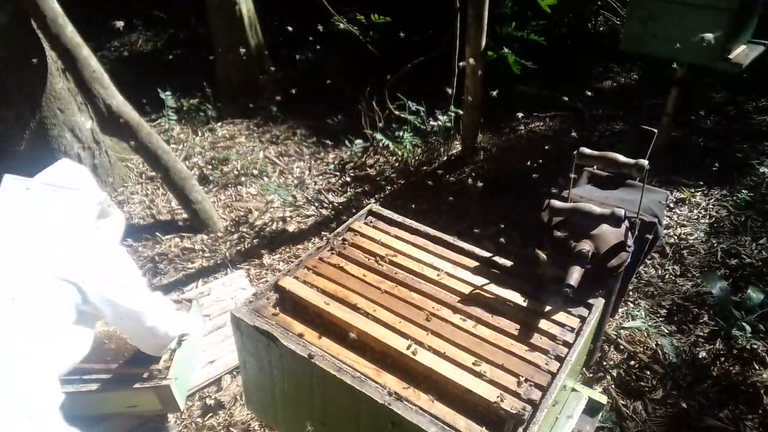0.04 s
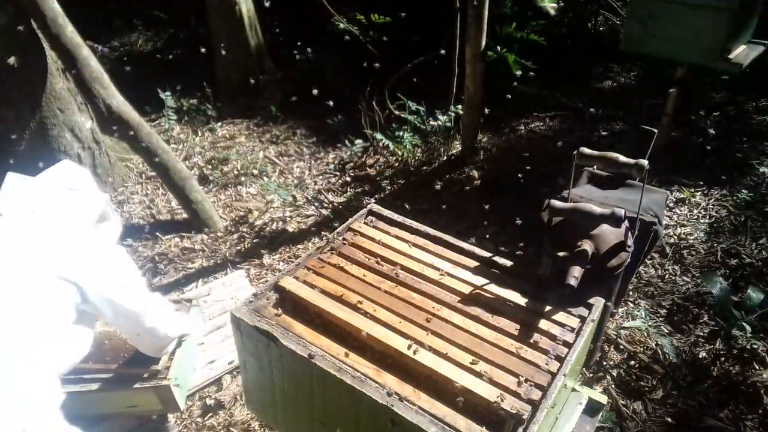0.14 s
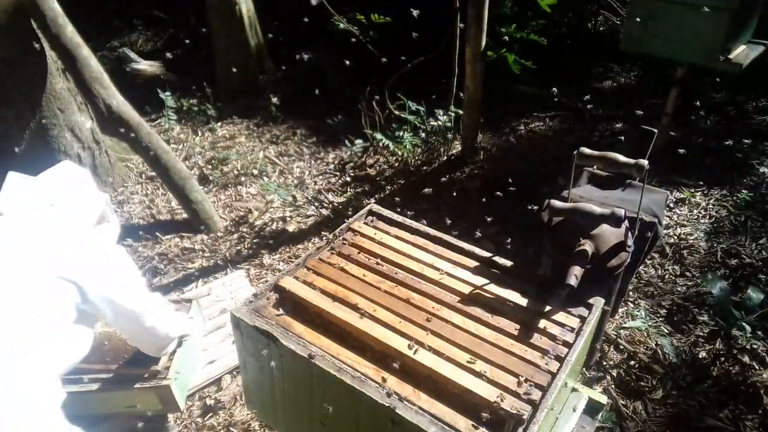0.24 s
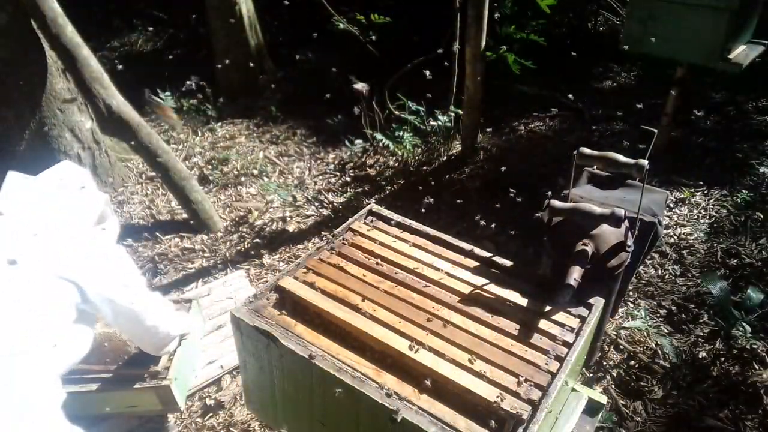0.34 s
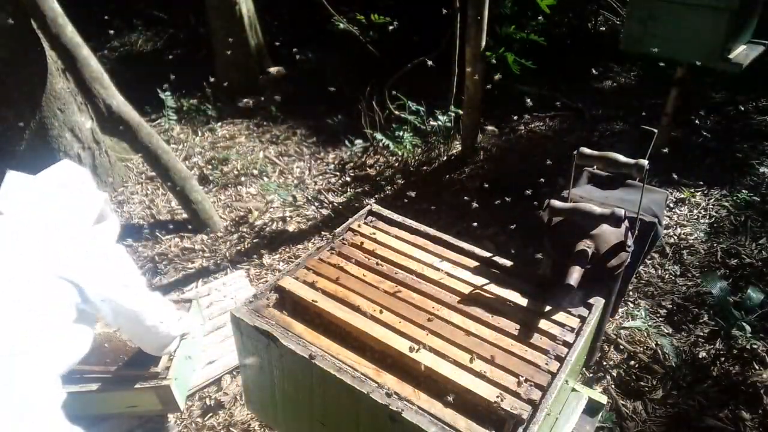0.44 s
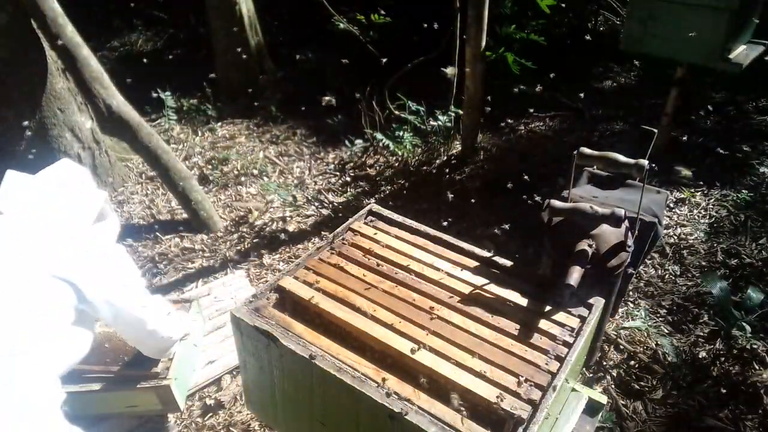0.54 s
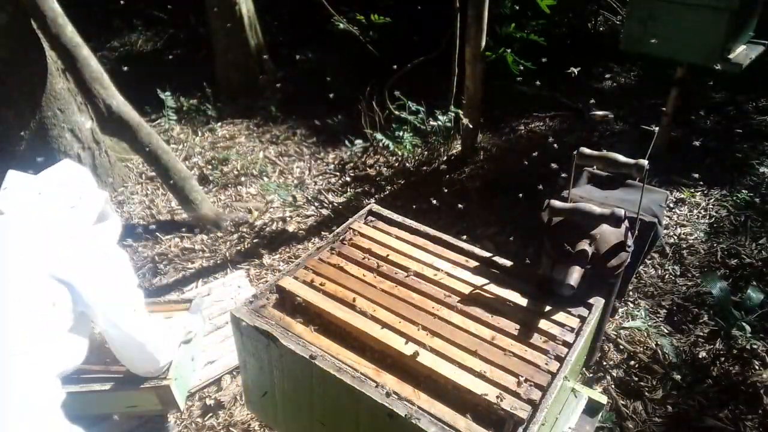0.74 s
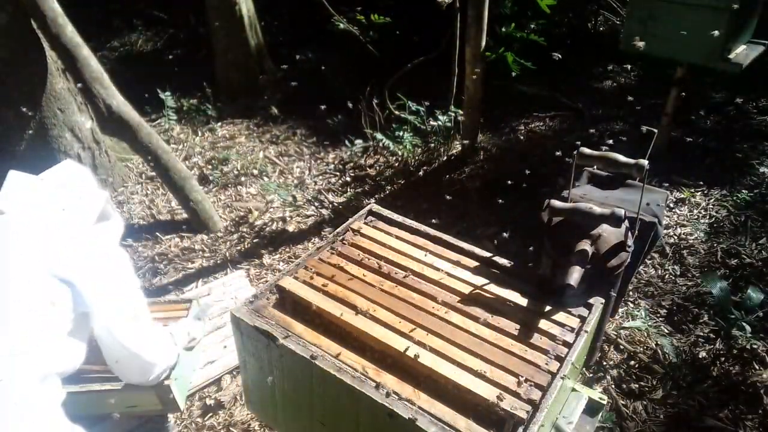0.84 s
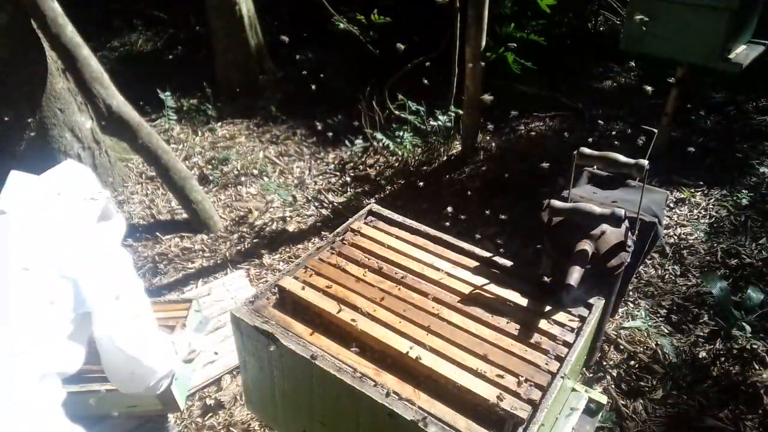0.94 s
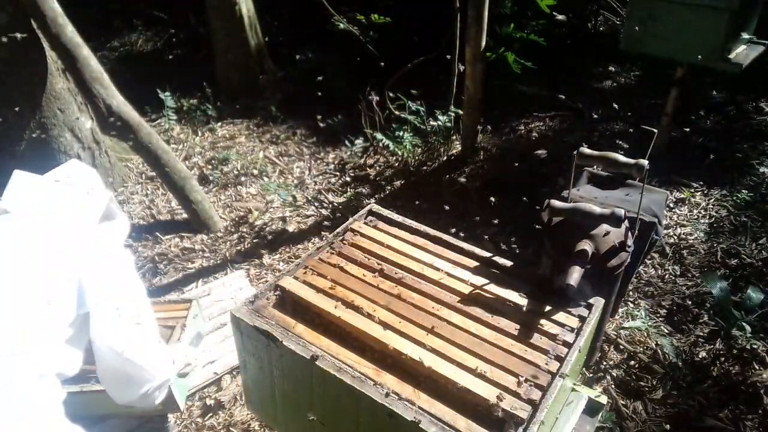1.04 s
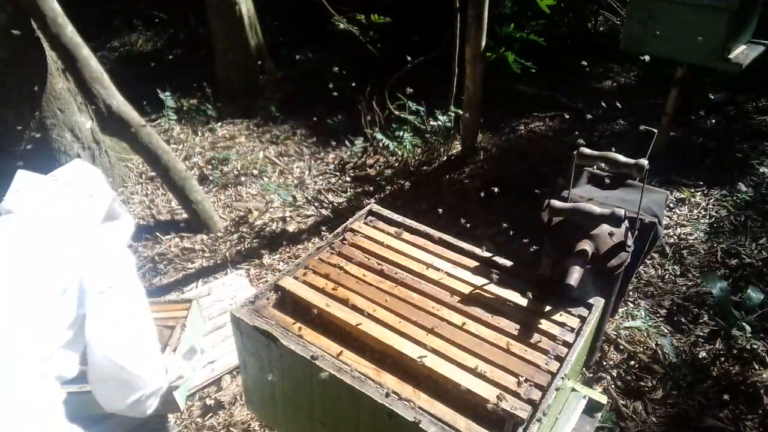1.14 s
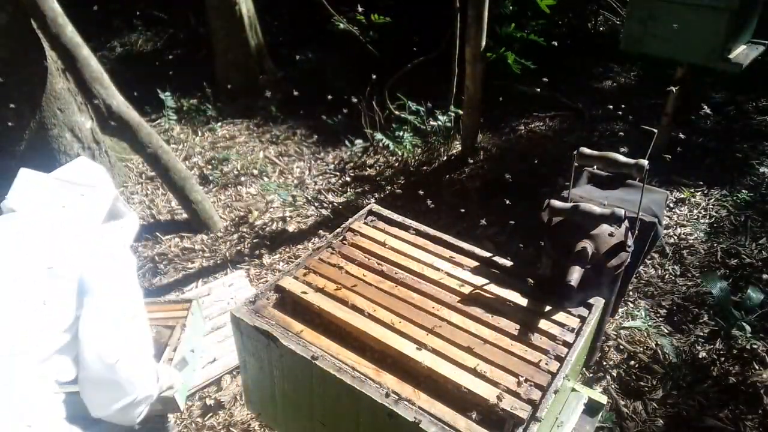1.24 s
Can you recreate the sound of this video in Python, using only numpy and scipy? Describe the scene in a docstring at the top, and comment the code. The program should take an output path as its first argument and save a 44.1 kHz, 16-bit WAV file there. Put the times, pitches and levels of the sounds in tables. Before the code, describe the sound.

A close, loud bee buzz starts at once over a dense swarm hum; a soft bump, then a hard wood-on-wood knock follow, before the bees recede into softer humming, light rustle and faint outdoor air.

```python
"""A bee buzzes close by at first, then a swarm hums further off round an opened wooden hive outdoors.
Wing tips tick in short runs; a handled frame gives a soft bump, then one sharp knock that rattles briefly.
Each bee repeats a wing-stroke wave at an unsteady wingbeat; ticks, bump and knock ring damped sines.
Rustle and outdoor air are coloured noise, the rustle with stray faint ticks."""
import sys
import numpy as np
from scipy import signal
from scipy.fft import rfft, irfft
from scipy.io import wavfile

SR = 44100
rng = np.random.default_rng(int(sys.argv[2]) if len(sys.argv) > 2 else 0)


def bounce(signal):
    """Save signal as a 16-bit WAV file at the path given by the first command-line argument."""
    frames = np.transpose(np.atleast_2d(signal))
    limited = np.clip(frames, -1, 1)
    pcm = np.round(limited * 32767).astype(np.int16)
    wavfile.write(sys.argv[1], SR, pcm)


N = 57330

# resonances of a ticked surface: (frequency [Hz], level [dB], t60 [s])
TICK_MODES = [(2400, -3.5, 0.0022), (4730, -1.5, 0.0048), (5680, -3, 0.0027)]


def from_db(db):
    """Decibels to amplitude gain."""
    return 10 ** (np.asarray(db) / 20)


def rms_one(x):
    """Scale to rms 1."""
    return x / np.sqrt(np.mean(x ** 2) + 1e-20)


def in_time(rows):
    """Interpolate each column of a time curve at every sample."""
    times_s, *columns = np.transpose(rows)
    return [np.interp(np.arange(N) / SR, times_s, column) for column in columns]


def at_hz(points, hz):
    """Gain of a spectrum, interpolated in dB over log frequency."""
    points_hz, db = np.transpose(points)
    return from_db(np.interp(np.log(hz + 1), np.log(points_hz), db))


def drift(rate_hz):
    """Smooth random wander of about unit spread: noise through a two-pole low-pass."""
    step, settle = 40, 2000  # samples per drift point; points dropped while the filter settles
    pole = np.exp(-2 * np.pi * rate_hz * step / SR)
    white = rng.standard_normal(N // step + settle + 2)
    slow = signal.lfilter([1], [1, -2 * pole, pole * pole], white)[settle:]
    return np.interp(np.arange(N) / step, np.arange(len(slow)), rms_one(slow))


def noise(tone):
    """White noise shaped by a spectrum, rms 1."""
    bins_hz = np.arange(N // 2 + 1) * SR / N
    return rms_one(irfft(rfft(rng.standard_normal(N)) * at_hz(tone, bins_hz), N))


def ring(clicks, modes, alternate=False):
    """Clicks excite a bank of two-pole resonators, optionally with alternating signs."""
    total = 0
    for k, (hz, db, t60_s) in enumerate(modes):
        pole = np.exp(-np.log(1000) / (t60_s * SR))
        turn = 2 * np.pi * hz / SR  # radians per sample
        sign = (-1) ** k if alternate else 1
        feedback = [1, -2 * pole * np.cos(turn), pole * pole]
        mode = signal.lfilter([0, np.sin(turn)], feedback, clicks + 1e-18)
        total = total + sign * from_db(db) * mode
    return total


def push(start_s, contact_s):
    """Half-sine force of one contact; its samples sum to 1."""
    force = np.sin(np.pi * np.clip((np.arange(N) / SR - start_s) / contact_s, 0, 1))
    return force / force.sum()


def scatter(x, db, t60_s):
    """Add a dense echo cloud: convolution with decaying noise of unit energy."""
    echoes = rng.standard_normal(N) * np.exp(-np.log(1000) * np.arange(N) / SR / t60_s)
    return x + from_db(db) * signal.fftconvolve(x, echoes / np.linalg.norm(echoes))[:N]


def buzz(beat_hz, tone, count=64):
    """Wing-stroke wave of random-phase overtones, read at an unsteady wingbeat; rms 1."""
    flutter, jitter = 0.00615, 0.00914  # quick and very quick pitch spread, as shares of the wingbeat
    unsteady_hz = beat_hz * (1 + flutter * drift(26.55) + jitter * drift(203))
    turns = np.cumsum(unsteady_hz) / SR
    overtones_hz = np.arange(1, count + 1) * beat_hz.mean()
    overtones = at_hz(tone, overtones_hz) * np.exp(2j * np.pi * rng.random(count))
    stroke = irfft(np.append(0, overtones), 2048)
    stroke_turns = np.linspace(0, 1, len(stroke), endpoint=False)
    return rms_one(np.interp(turns % 1, stroke_turns, stroke))


def single_bee(flight, tone):
    """A bee heard on its own: wingbeat and level follow its flight."""
    beat_hz, db = in_time(flight)
    return from_db(db) * buzz(beat_hz, tone)


def close_bee():
    """Passing wings are loud at first, then fade with distance."""
    # flight: (time [s], wingbeat [Hz], level [dB])
    flight = [(0, 266, -35), (.022, 258.6, -39), (.062, 272.5, -37.5), (.118, 280.8, -38),
              (.172, 262.6, -37.5), (.215, 272, -41), (.25, 255.9, -38.5), (.31, 264.8, -47.5),
              (.4, 268.5, -45.5), (.55, 266.4, -53), (.68, 264.8, -51), (1, 270.8, -71)]
    # overtone balance: (frequency [Hz], relative level [dB])
    tone = [(270, -1), (540, -3), (810, -10), (1100, -10), (1650, -12.5), (2300, -24), (3300, -31),
            (5200, -28), (7000, -34), (11000, -62), (16000, -37)]
    return single_bee(flight, tone)


def hovering_bee():
    """Wings beat at a nearly steady rate over the frames."""
    # flight: (time [s], wingbeat [Hz], level [dB])
    flight = [(0, 235.9, -44), (.15, 226, -46), (.29, 224, -44), (.42, 229, -52.5), (.76, 229.9, -51.5),
              (.96, 230.1, -50.5), (1.12, 236.6, -55.5), (1.3, 238.4, -57)]
    # overtone balance: (frequency [Hz], relative level [dB])
    tone = [(230, -9.5), (460, 1), (690, -9.5), (920, -9.5), (1150, -14), (1390, -8), (1900, -22.5),
            (5000, -17), (7000, -40)]
    return single_bee(flight, tone)


def slow_bee():
    """A slow wingbeat gives a lower hum that drifts by early on."""
    # flight: (time [s], wingbeat [Hz], level [dB])
    flight = [(0, 205, -53), (.09, 192, -50), (.16, 203, -48), (.28, 192, -56), (.38, 197.7, -51),
              (.52, 182, -60.5), (.7, 185, -64.5)]
    # overtone balance: (frequency [Hz], relative level [dB])
    tone = [(195, 0), (390, -8), (590, -9), (1000, -13), (1500, -15), (2500, -22), (5000, -24)]
    return single_bee(flight, tone)


def circling_bee():
    """A shrill bee further off; level and wingbeat rise and fall as it circles."""
    # flight: (time [s], wingbeat [Hz], level [dB])
    flight = [(0, 290, -56), (.33, 281, -58), (.4, 285, -53), (.55, 279, -49.5), (.65, 290, -53.5),
              (.8, 268, -54), (.96, 271, -51.5), (1.04, 285, -54), (1.13, 290, -58), (1.22, 272, -52),
              (1.3, 275, -59)]
    # overtone balance: (frequency [Hz], relative level [dB])
    tone = [(280, -7), (560, 0), (840, -12), (1120, -10), (1400, -7), (2000, -18), (5000, -24), (7000, -40)]
    return single_bee(flight, tone)


def swarm(count=16):
    """Many bees sum to a hum, each wandering in pitch and distance."""
    # level of the whole swarm: (time [s], level [dB])
    swarm_level = [(0, -42), (.17, -39.5), (.3, -43.5), (.45, -47.5), (.7, -50.5), (1, -50.5),
                   (1.24, -48.5), (1.3, -51)]
    # overtone balance: (frequency [Hz], relative level [dB])
    tone = [(190, -5), (250, -3.5), (370, -5), (540, 0), (680, -6.5), (1000, -8.5), (1400, -6), (2100, -15),
            (3200, -18), (5200, -17), (7000, -40), (12000, -70)]
    low_hz, high_hz = 205.17, 289.9
    wander, swell_db = .035, 4  # spread of wingbeat (share) and of level
    bees = 0
    for hz in np.linspace(low_hz, high_hz, count):
        bee = buzz(hz * (1 + wander * drift(2)), tone)
        bees = bees + bee * from_db(swell_db * drift(4.7))
    return from_db(in_time(swarm_level)[0]) * rms_one(bees)


def frame_knock():
    """Contact forces ring the hive body, wood on wood cracks; boxes and trunks echo both."""
    # frame contacts: (time [s], thud drive [dB], contact time [s], crack drive [dB])
    knocks = [(0.2168, -18, 0.00033, -63), (0.2203, -6.5, 0.00057, -3), (0.2245, -5.5, 0.00039, -13.5),
              (0.2273, -12.5, 0.0033, -38), (0.2323, -9, .0014, -24), (0.2407, -13.5, 0.0014, -40)]
    # hive body resonances: (frequency [Hz], level [dB], t60 [s])
    wood_modes = [(123, -16, 0.042), (212.6, -3, 0.032), (318, -3, 0.056), (382, -11.5, 0.057),
                  (547, -6, 0.038), (612, -15, 0.03), (711, -22, 0.097), (797, -16, 0.046),
                  (1007, -7.5, 0.011), (1300, -13, .012), (1500, -36, .025)]
    # wood-on-wood crack resonances: (frequency [Hz], level [dB], t60 [s])
    crack_modes = [(1860, -11, 0.0031), (2810, -10, 0.0071), (3130, -10.5, 0.0058), (4400, -5, 0.0052),
                   (5130, -10.5, 0.0072), (5650, -7.5, .004), (7200, -13.5, 0.0031), (9720, -18.5, 0.0016)]
    pushes, cracks = np.zeros(N), np.zeros(N)
    for start_s, thud_db, contact_s, crack_db in knocks:
        pushes += from_db(thud_db) * push(start_s, contact_s)
        cracks[int(start_s * SR)] += from_db(crack_db)
    # the crack bounces about between the frames
    crack = scatter(ring(cracks, crack_modes, alternate=True), db=-8, t60_s=0.016)
    thud = ring(pushes, wood_modes)
    return scatter(thud + crack + frame_bump(), db=-30, t60_s=0.22)


def frame_bump():
    """A nudge of the frame: one soft push rings low modes."""
    # bump resonances: (frequency [Hz], level [dB], t60 [s])
    bump_modes = [(125, 2.5, 0.028), (198, 5, 0.041)]
    nudge = from_db(-23.5) * push(start_s=.0525, contact_s=0.0016)
    return ring(nudge, bump_modes, alternate=True)


def wing_ticks():
    """A wing tip touches once a stroke, weaker on average each time; crispness varies by run."""
    # runs: (start [s], length [s], stroke rate [Hz], first touch drive [dB], relative crispness [dB])
    wing_runs = [(.0362, .010, 245, -23, 2.5), (.0515, .011, 104, -34, -6), (.0892, .002, 220, -32, 6),
                 (.1436, .002, 240, -26.5, 3), (.1746, .006, 260, -25.5, 6.5), (.188, .006, 690, -27.5, -1),
                 (.1965, .007, 180, -32, 14.5), (.2767, .012, 215, -27.5, 2), (.3262, .007, 195, -29.5, 4),
                 (.3621, .002, 265, -25, -4), (.369, .007, 198, -29.5, -3.5), (.4904, .002, 220, -32, 6),
                 (.6079, .007, 250, -29, 3), (.617, .017, 218, -27.5, 1), (.6432, .007, 230, -30, 3),
                 (.6569, .007, 170, -30, 0), (.6789, .002, 220, -29.5, 2), (.6872, .011, 205, -34.5, 1),
                 (.7919, .011, 260, -32, -4), (.8262, .007, 215, -32.5, -2.5),
                 (.8658, .002, 240, -31.5, 0.5), (.8913, .008, 250, -33, -5),
                 (.9053, .002, 215, -31.5, -10), (0.9185, .007, 180, -33, -7),
                 (.9268, .002, 220, -31.5, -6), (.9352, .011, 250, -29, -5), (.9522, .007, 192, -27, -4.5),
                 (1.0051, .002, 265, -31.5, -16), (1.0392, .002, 180, -35, -6),
                 (1.1405, .002, 235, -39, -6), (1.1737, .002, 250, -31, -4), (1.2, .002, 180, -33.5, -6)]
    # crisp top resonances: (frequency [Hz], level [dB], t60 [s])
    top_modes = [(7980, -12, 0.003), (10300, -18.5, 0.0021)]
    stroke_loss_db, stroke_spread_db, max_strokes = 2.5, 1.5, 12
    clicks, crisp = np.zeros(N), np.zeros(N)
    for start_s, length_s, rate_hz, db, crisp_db in wing_runs:
        chance = rng.standard_normal(max_strokes)
        delays_s = np.arange(0, length_s, 1 / rate_hz)[:max_strokes]
        for k, delay_s in enumerate(delays_s):
            i = int((start_s + delay_s) * SR)
            touch_db = db - stroke_loss_db * k + stroke_spread_db * chance[k]
            clicks[i] += from_db(touch_db)
            crisp[i] += from_db(touch_db + crisp_db)
    return ring(clicks, TICK_MODES, alternate=True) - ring(crisp, top_modes, alternate=True)


def rustle():
    """Wings and legs on the combs: flickering noise plus stray faint ticks."""
    # rustle level: (time [s], level [dB])
    rustle_level = [(0, -45), (.2, -49), (.38, -43.5), (.46, -51), (.7, -51), (.92, -50), (1.05, -51.5),
                    (1.3, -52.5)]
    # noise colour: (frequency [Hz], relative level [dB])
    tone = [(100, -13), (300, 9.5), (1500, 1.5), (2300, -1), (3200, -1), (4000, -2.5), (5400, 2.5),
            (6300, -4.5), (7200, -16), (10000, -41), (13000, -40), (16000, -17)]
    ticks_per_s, tick_db, tick_spread_db = 150, 7.5, 3  # tick drive is relative to the rustle
    struck = rng.random(N) < ticks_per_s / SR
    chance = np.clip(rng.standard_normal(N), -2, 2)
    stray = struck * from_db(tick_db + tick_spread_db * chance)
    hiss = noise(tone) * from_db(1.5 * drift(47))
    return from_db(in_time(rustle_level)[0]) * (hiss + ring(stray, TICK_MODES, alternate=True))


def outdoor_air():
    """Steady, faint noise, weighted to the bass and low mids."""
    # noise colour: (frequency [Hz], relative level [dB])
    tone = [(20, -22), (60, -3), (130, -16.5), (220, -12), (600, -4), (2000, -21), (8000, -45),
            (16000, -54)]
    return from_db(-60) * noise(tone)


def scene():
    """Bees, frame and outdoor air summed at one microphone."""
    near = close_bee() + hovering_bee() + slow_bee() + circling_bee()
    return (near + swarm() + frame_knock() + wing_ticks() + rustle() + outdoor_air())[None]


def record(dry, low_cut_hz=88, high_cut_hz=11000, cutoff_hz=16200):
    """The microphone thins deep bass and high treble; a steep low-pass cuts the top."""
    thin = signal.sosfilt(signal.butter(3, low_cut_hz, "high", fs=SR, output="sos"), dry)
    dull = signal.sosfilt(signal.butter(1, high_cut_hz, fs=SR, output="sos"), thin)
    return signal.sosfilt(signal.ellip(10, .5, 80, cutoff_hz, fs=SR, output="sos"), dull)


dry = scene()
out = record(dry)
bounce(out)
```